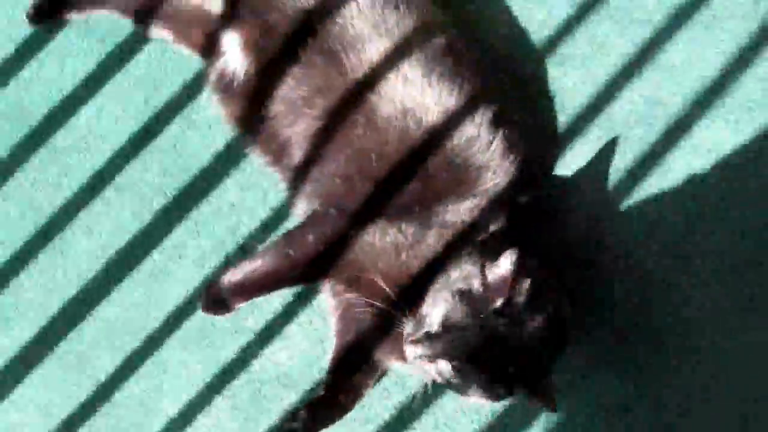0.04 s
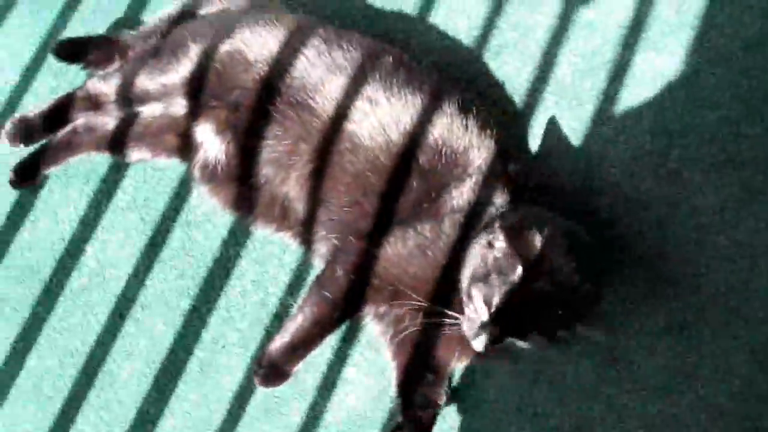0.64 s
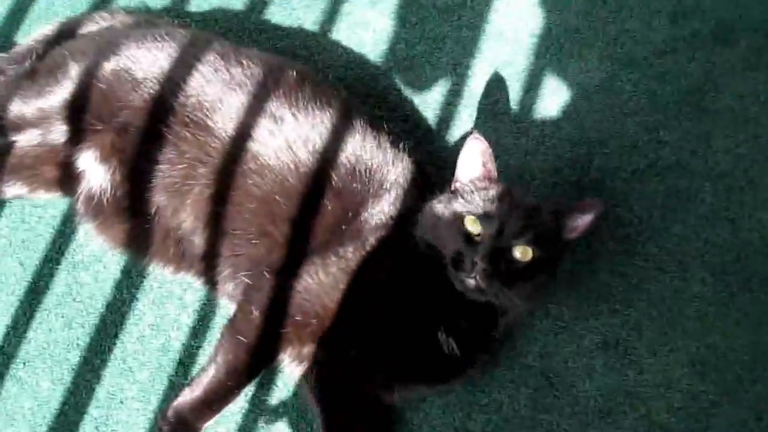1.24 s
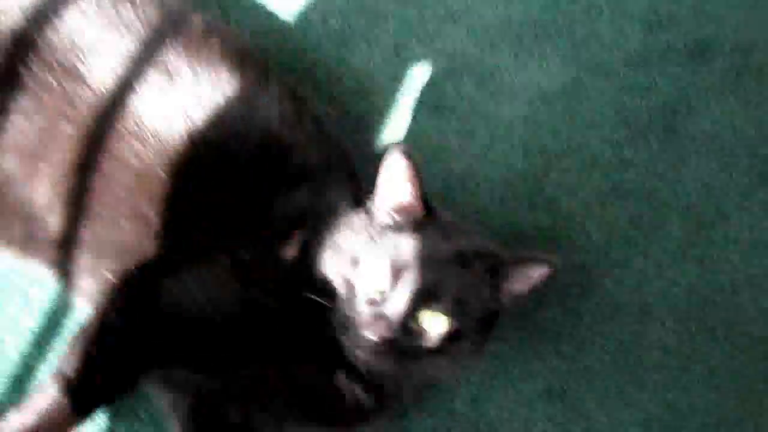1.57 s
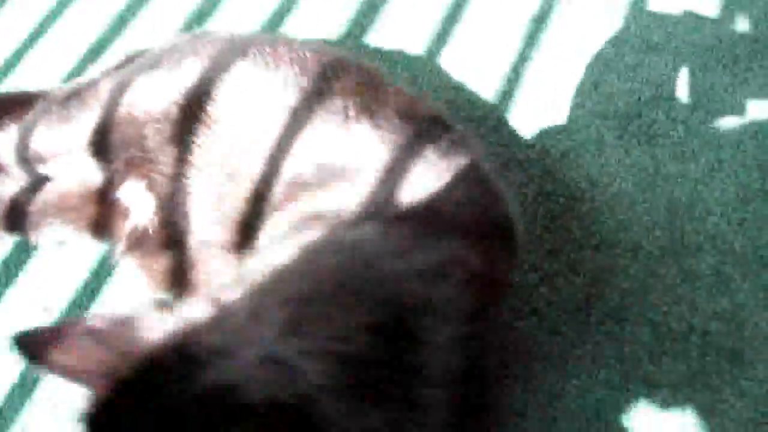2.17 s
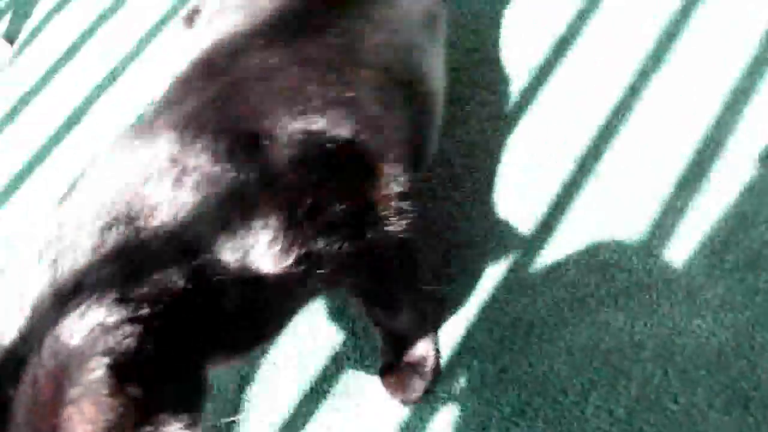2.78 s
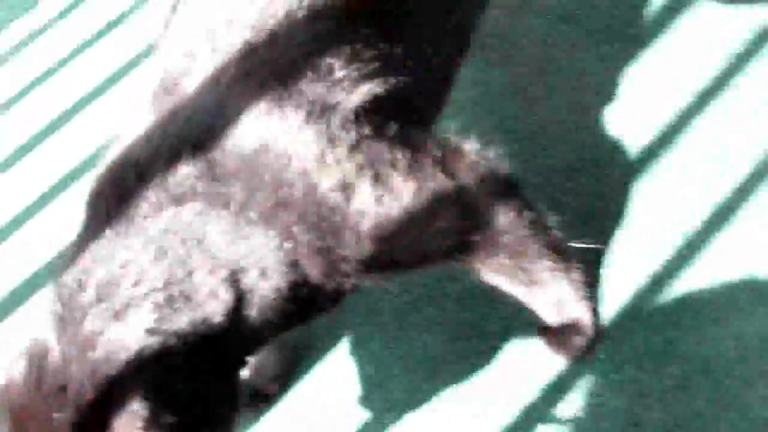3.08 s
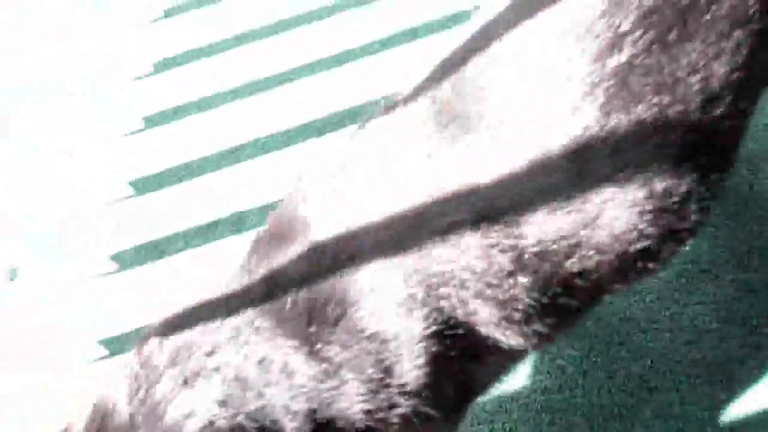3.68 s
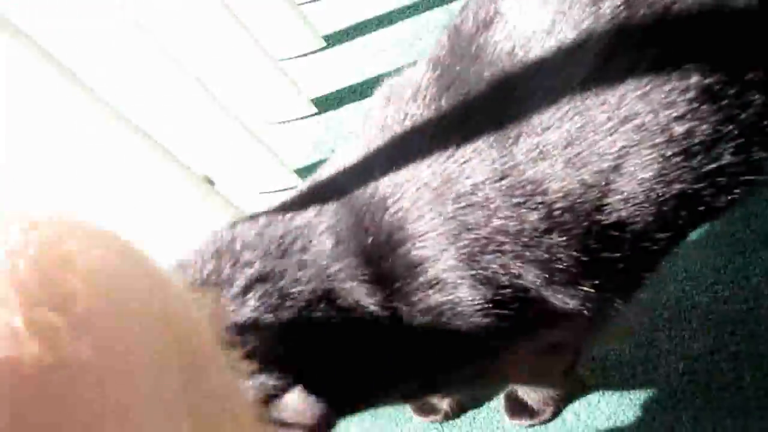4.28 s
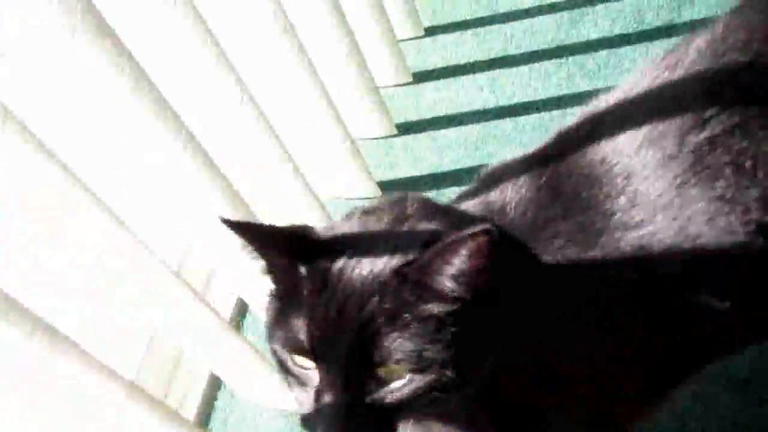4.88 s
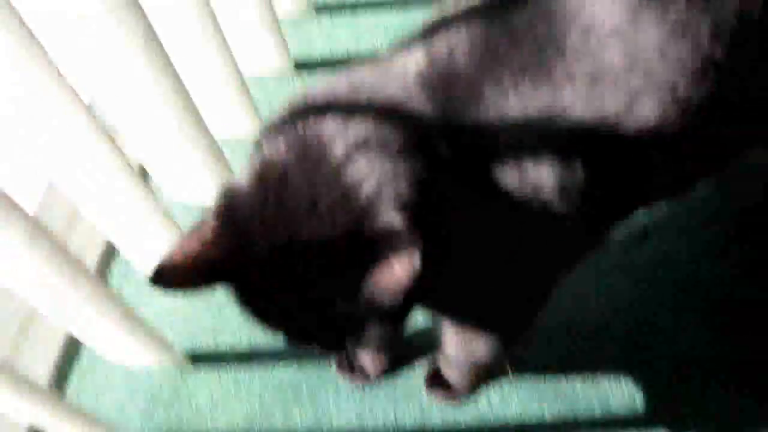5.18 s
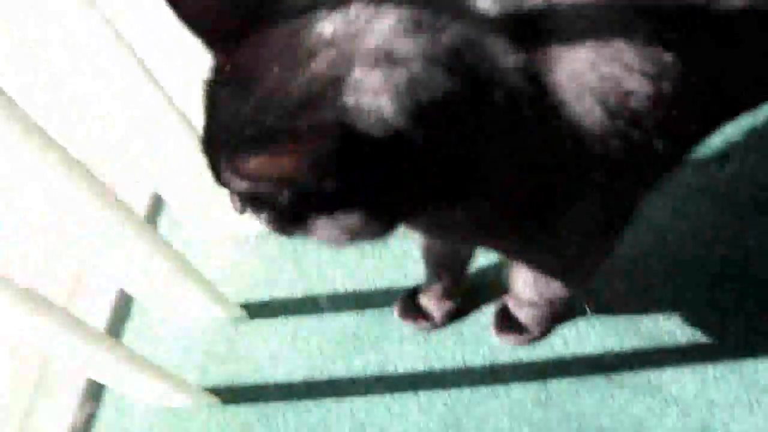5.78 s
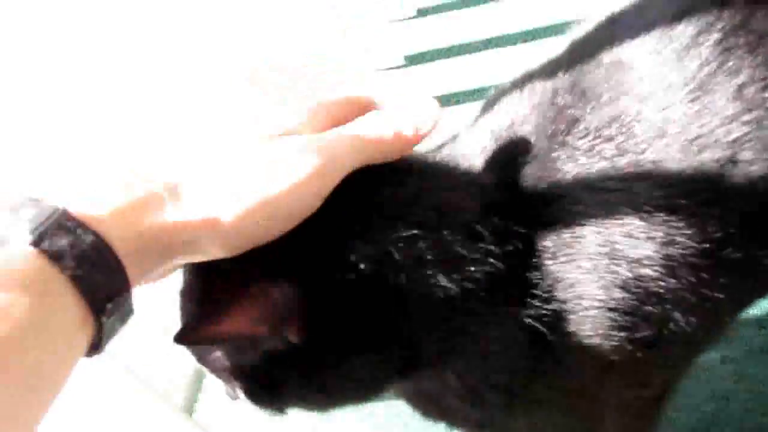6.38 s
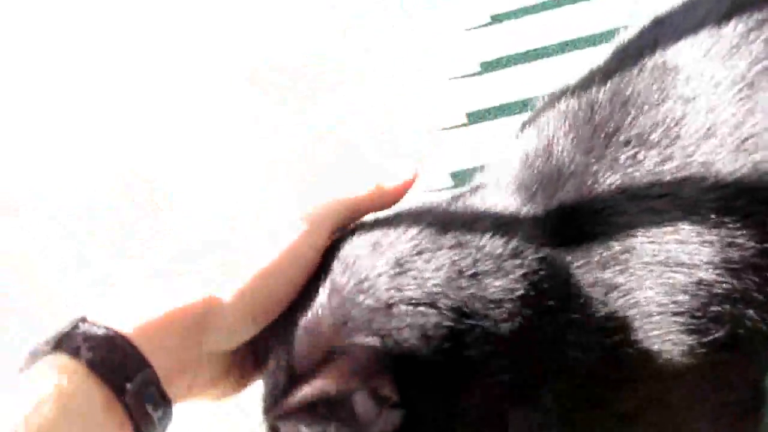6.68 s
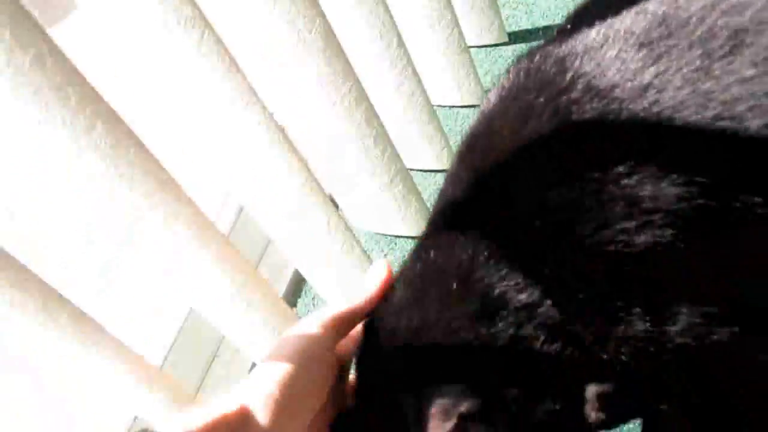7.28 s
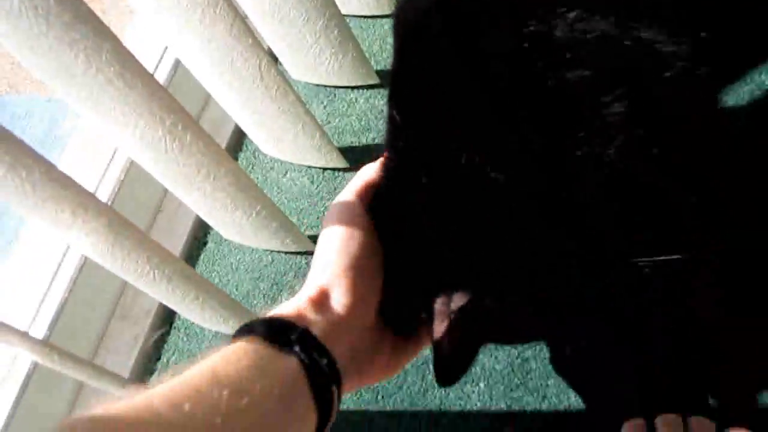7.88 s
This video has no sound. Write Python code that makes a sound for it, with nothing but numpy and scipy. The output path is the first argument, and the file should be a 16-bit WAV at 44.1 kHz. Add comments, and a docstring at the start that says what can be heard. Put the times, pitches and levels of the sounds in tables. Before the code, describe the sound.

Indoors, very close to the single microphone of a small hand-held camera, faint fur rustling and soft bumps sit over steady hiss. Then come three loud clusters of plastic clicks and creaks from a gripping hand, mixed with scratchy rubbing of skin and a cat's fur. A short dropout precedes the last cluster. The end is quieter, with scattered clicks and two more dropouts.

```python
"""First a soft brush of fur and two dull thuds over a thin hiss and whine: a cat rolls on a carpet and
is stroked, close to the one microphone of a small hand-held camera. Skin and fur brush over the camera.
Right at the microphone, the gripping hand sticks and slips, and the plastic case clicks and creaks.
The loudest clicks overload the input; three times the microphone's contact opens and the sound cuts out."""
import sys
import numpy as np
from scipy import signal
from scipy.fft import rfft, irfft
from scipy.io import wavfile
from scipy.ndimage import uniform_filter1d, minimum_filter1d

SR = 44100
rng = np.random.default_rng(int(sys.argv[2]) if len(sys.argv) > 2 else 0)


def unload_wav(signal):
    """Save mono or channel-first audio to the path in sys.argv[1] as 16-bit WAV at rate SR, clipped to [-1, 1]."""
    wavfile.write(
        sys.argv[1],
        SR,
        np.round(np.clip(np.atleast_2d(signal).T, -1, 1) * 32767).astype(np.int16),
    )


N = 350003
TIME = np.arange(N) / SR

# course of the noise floor: (time [s], level [dB])
HISS_LEVELS = [(0, -40), (.25, -46), (.9, -45.5), (1.5, -42.5), (2.1, -46.5), (2.8, -44), (3.5, -47),
               (4.7, -44), (5.9, -46.5), (6.6, -46), (7.94, -45.5)]
# colour of the camera's hiss: (frequency [Hz], relative level [dB])
HISS_SPECTRUM = [(30, -11), (70, -10), (300, -11.5), (600, -12.5), (850, -7), (1200, -7), (1430, -20.5),
                 (1750, -13.5), (2000, -10.5), (2900, -17.5), (4300, -21.5), (7000, -26), (8000, -25.5),
                 (16000, -34.5)]
# the camera's electronic whine: (frequency [Hz], level [dB], wander [Hz])
WHINE_TONES = [(7870, -63, 16), (15735, -73, 3)]

# soft bumps of paw and hand nearby: (time [s], level [dB], centre [Hz])
SOFT_BUMPS = [(.049, -47, 338), (.119, -40.5, 530), (.734, -52, 190), (1.136, -44, 275),
              (1.615, -39.5, 313), (1.675, -44, 220), (2.01, -42, 537), (4.605, -48, 200),
              (5.175, -40, 110), (5.454, -37.5, 110)]
# the hand knocks the camera and damps it: (time [s], level [dB], 60 dB decay time [s])
CAMERA_KNOCKS = [(.334, -32.5, .15), (2.852, -33.5, .075), (5.013, -22.5, .025)]
# resonances of the whole camera: (frequency [Hz], width [Hz], gain [dB])
CAMERA_MODES = [(255, 90, -6), (800, 190, 0), (1410, 300, -9)]

# skin and fur brushing past the microphone:
# (start [s], length [s], dull rub level [dB], bright hiss re rub [dB], case hollow re rub [dB])
FUR_STROKES = [(0, .3, -54.5, -11, -15), (.74, .27, -54, -15, -5), (1.238, .07, -48, 1, -12),
               (1.35, 1.2, -54, -2, -13), (2.128, .04, -31, -4, 5), (2.174, .028, -27, 2.5, 0),
               (2.203, .027, -40, -8, 4), (2.24, .045, -30, 0, -3), (2.278, .1, -30.5, -3, 1),
               (2.46, .06, -31.5, -13, -6), (3.92, .26, -45.5, -5, -12), (5.013, .033, -33, -5, 1.5),
               (5.083, .055, -36.5, -11, -3), (5.19, .24, -37, -5, -13), (5.41, .056, -35.5, -8, -7),
               (5.56, .065, -40, 1, -11), (6.814, .08, -48, -11, -12)]
# the dull rub of fur: (frequency [Hz], relative level [dB])
RUB_SPECTRUM = [(60, -33), (560, -20.5), (800, -5.5), (1300, -2.5), (2400, 1), (3700, 0), (4800, -8),
                (7000, -9), (11000, -28.5), (16000, -39.5)]
# the bright hiss of a fast stroke: (frequency [Hz], relative level [dB])
BRIGHT_SPECTRUM = [(60, -45), (500, -22.5), (2500, -7.5), (3800, 6.5), (5300, -7), (6700, -1.5),
                   (8100, 0.5), (9400, -6), (11300, -12.5), (16000, -19)]

# broad knock of the plastic case: (frequency [Hz], relative level [dB])
CASE_SPECTRUM = [(100, -52), (520, -36.5), (750, -8.5), (1050, 1.5), (1450, -6), (1900, -6), (2450, -4),
                 (2900, -5), (3700, -4), (4800, -18.5), (6500, -34.5), (10000, -44), (16000, -49.5)]
# resonances of the case: (frequency [Hz], width [Hz], gain [dB])
CASE_RESONANCES = [(759, 41, 2), (987, 79, -5), (1450, 120, 1), (2456, 260, 1)]
# squeezes of the case, each a run of stick-slip: (start [s], length [s], level [dB])
SQUEEZES = [(2.127, .085, -20), (2.238, .052, -23), (2.286, .064, -14), (2.402, .018, -29),
            (2.548, .085, -38), (3.17, .022, -31), (3.268, .044, -30), (3.391, .032, -27),
            (3.739, .021, -31), (3.804, .021, -18), (3.861, .013, -19), (3.881, .027, -15.5),
            (3.977, .049, -32), (4.042, .06, -15), (4.186, .016, -24), (4.549, .06, -25),
            (5.087, .026, -29), (5.113, .034, -21), (5.34, .034, -29), (5.45, .014, -17),
            (5.553, .07, -15.5), (5.696, .05, -36), (6.382, .026, -32)]
# bright crack of a hard snap: (frequency [Hz], relative level [dB])
CRACK_SPECTRUM = [(50, -42), (500, -23.5), (1500, -10.5), (3000, 1), (5200, 0), (6100, -2), (7300, -4),
                  (9500, -7), (12500, -13), (16000, -15.5)]
# small parts ringing around the microphone: (frequency [Hz], width [Hz], gain [dB])
CRACK_RESONANCES = [(2030, 200, 1), (3340, 900, -6.5), (5190, 260, -3), (7150, 340, 0)]
# the loudest slips of the case: (time [s], ring level [dB], ring centre [Hz], crack level [dB])
CASE_SLIPS = [(1.2388, -25, 3180, -25), (1.7633, -28, 3000, -44), (2.1286, 0, 1850, -7.5),
              (2.159, -18, 1720, -24.5), (2.2915, -8, 1680, -20), (2.336, -8.5, 1700, -44),
              (2.4021, -16.5, 2150, -29), (2.4365, -16.5, 1430, -68), (2.4457, -8, 1650, -13),
              (2.5521, -19, 1550, -56), (2.6607, -20, 1760, -52), (2.8494, -0.5, 1930, -2.5),
              (3.1796, -22.5, 1650, -49), (3.2855, -19, 1430, -59), (3.749, -19.5, 1450, -50),
              (3.8025, -19, 1810, -55), (3.831, -9.5, 1700, -28), (3.8807, -8, 1630, -30.5),
              (4.0212, -23, 1450, -13.5), (4.06, -18.5, 1800, -22), (4.1609, -13.5, 1780, -34),
              (4.1848, -21, 1620, -52), (4.2012, -19, 1700, -52), (4.3237, -25.5, 1310, -55),
              (5.015, -15, 950, -23.5), (5.022, -12, 1700, -8.5), (5.1176, -15, 1730, -50),
              (5.145, -11, 1870, -37), (5.1494, -16, 2370, -48), (5.1753, -5, 1880, -24),
              (5.1796, -4, 1720, -29.5), (5.2455, -21.5, 920, -42), (5.2944, -18.5, 1570, -32),
              (5.3999, -25, 2580, -22.5), (5.4536, -11.5, 1500, -8), (5.4598, -29, 1980, -14.5),
              (5.5413, -13, 1860, -46), (5.5682, -8, 1700, -35), (5.5782, -5, 1760, -26.5),
              (5.5924, -21, 1640, -24.5), (5.6245, -19.5, 1390, -27.5), (5.6618, -19.5, 1740, -44),
              (5.7497, -24.5, 1770, -54), (6.083, -16.5, 1750, -47), (6.382, -16, 1800, -55),
              (6.6169, -37.5, 1450, -34), (6.846, -30, 1600, -52), (7.6816, -15, 1720, -53),
              (7.892, -16, 1790, -64)]

# the microphone's contact is open: (start [s], end [s])
OPEN_CONTACT = [(4.852, 4.9945), (6.186, 6.327), (7.087, 7.2285)]
# it bounces once as it opens: (delay [s], length [s], gain [dB])
CONTACT_BOUNCE = (.0115, .007, 9)


def undb(db):
    """Decibels to gain."""
    return 10 ** (np.asarray(db) / 20)


def level(x, db, size=None):
    """Scale x so that its energy, spread over size samples, has this rms level."""
    return x * undb(db) / np.sqrt(np.sum(x ** 2) / (size or len(x)) + 1e-20)


def add(out, start_s, x):
    """Mix x into out from start_s on."""
    i = max(int(start_s * SR), 0)
    out[i:i + len(x)] += x[:max(N - i, 0)]


def drift(rate_hz):
    """Smooth random drift with a spread near 1."""
    knots = rng.standard_normal(int(rate_hz * N / SR) + 2)
    return np.interp(TIME * rate_hz, np.arange(len(knots)), knots)


def response(spectrum):
    """Minimum-phase impulse response with the given spectrum."""
    hz, db = np.transpose(spectrum)
    grid_hz = np.maximum(np.fft.rfftfreq(1024, 1 / SR), 1)
    gain = undb(np.interp(np.log(grid_hz), np.log(hz), db))
    cepstrum = irfft(np.log(gain))
    half = len(cepstrum) // 2
    folded = np.r_[cepstrum[0], 2 * cepstrum[1:half], np.zeros(half)]
    return irfft(np.exp(rfft(folded)))[:half]


def resonate(x, hz, width_hz):
    """Two-pole resonance, gain 1 at its centre."""
    return signal.lfilter(*signal.iirpeak(hz, hz / width_hz, fs=SR), x)


def band(x, hz, width_hz):
    """A resonance applied twice, for steep sides."""
    return resonate(resonate(x, hz, width_hz), hz, width_hz)


def noise_floor(hollow_hz=1150, flicker_db=1.84):
    """The camera's own flickering hiss, with a hollow resonance and a thin electronic whine."""
    hiss = signal.fftconvolve(rng.standard_normal(N), response(HISS_SPECTRUM))[:N]
    hollow = resonate(rng.standard_normal(N), hollow_hz, width_hz=200)
    hollow = resonate(hollow, hollow_hz, width_hz=390)
    floor_db = np.interp(TIME, *np.transpose(HISS_LEVELS)) + flicker_db * drift(rate_hz=14)
    out = (level(hiss, -1) + level(hollow, -6)) * undb(floor_db)
    for hz, db, wander_hz in WHINE_TONES:
        pitch_hz = hz + wander_hz * drift(rate_hz=55)
        out += level(np.sin(2 * np.pi * np.cumsum(pitch_hz) / SR), db)
    return out


def thump(db, hz, width_hz, t60_s, rise_s=.003):
    """A soft push that dies away in one resonance."""
    t = np.arange(SR // 3) / SR
    envelope = (1 - np.exp(-t / rise_s)) * np.exp(-np.log(1000) * t / t60_s)
    push = rng.standard_normal(len(t)) * envelope
    return level(band(push, hz, width_hz), db, size=SR // 40)


def bumps():
    """Paw and hand land nearby with short, dull thuds; a knock on the camera rings its low modes."""
    out = np.zeros(N)
    for start, db, hz in SOFT_BUMPS:
        add(out, start, thump(db, hz, width_hz=1.05 * hz, t60_s=.09))
    for start, db, t60_s in CAMERA_KNOCKS:
        for hz, width_hz, mode_db in CAMERA_MODES:
            add(out, start, thump(db + mode_db, hz, width_hz, t60_s))
    add(out, 3.734, thump(db=-35, hz=38, width_hz=26, t60_s=.59))  # rumble as the camera swings round
    return out


def swell(length_s, attack_share, shape):
    """Pressure of a touch: it builds to a peak and lets go."""
    progress = np.linspace(0, 1, int(length_s * SR))
    return np.interp(progress, [0, attack_share, 1], [0, 1, 0]) ** shape


def fur_strokes(grain_db=2.5, firm_db=-30, firm_catch_db=4, sudden_s=.09):
    """Hairs flick past the microphone; firm contact catches in jerks and sounds the case's hollow."""
    flicks = rng.standard_normal(N) * undb(grain_db * rng.exponential(size=N).clip(0, 5))
    rub = signal.fftconvolve(flicks, response(RUB_SPECTRUM))[:N]
    bright = signal.fftconvolve(flicks, response(BRIGHT_SPECTRUM))[:N]
    bright += undb(1) * band(bright, hz=9300, width_hz=900)
    hollow = band(flicks, hz=800, width_hz=110) + undb(-6) * band(flicks, hz=1300, width_hz=420)
    out, jerks = np.zeros(N), drift(rate_hz=330)
    for start, length, db, bright_db, hollow_db in FUR_STROKES:
        attack_share = .6 * length / (length + sudden_s)  # short strokes start abruptly
        pressure = swell(length, attack_share, shape=.9)
        first = int(start * SR)
        span = slice(first, first + len(pressure))
        catch_db = firm_catch_db * undb((db - firm_db) / 2)  # light strokes glide more evenly
        pressure *= undb(catch_db * jerks[span])
        for sound, relative_db in (rub, 0), (bright, bright_db), (hollow, hollow_db):
            add(out, start, level(sound[span] * pressure, db + relative_db))
    return out


def plastic_response(spectrum, modes):
    """Impulse response of a plastic part: a broad knock and a few modes that ring on."""
    knock = np.pad(response(spectrum), (0, SR // 60))
    return knock + sum(undb(db) * resonate(knock, hz, width_hz) for hz, width_hz, db in modes)


def case_ring(force, case, hz, width_hz, broad_db):
    """The case answers a force; the place of contact favours one part of its range."""
    sound = signal.fftconvolve(force, case)
    return band(sound, hz, width_hz) + undb(broad_db) * sound


def case_creaks(case, slip_hz=500, unevenness=.5, scatter_db=3.3, scrape_db=-26, octaves_per_db=.008):
    """A finger beside the microphone sticks and slips a few hundred times a second, never evenly."""
    out = np.zeros(N)
    for start, length, db in SQUEEZES:
        pressure = swell(length, attack_share=.3, shape=.6)
        timing, strength = rng.standard_normal((128, 2)).T
        slip_at = np.cumsum(SR / slip_hz * np.exp(unevenness * timing)).astype(int)
        slip_at -= slip_at[0] // 2
        force = undb(scrape_db) * rng.standard_normal(SR // 4)[:len(pressure)]
        inside = slip_at < len(force)
        force[slip_at[inside]] += undb(scatter_db * strength[inside])
        ring_hz = 1700 * 2 ** (octaves_per_db * db)  # a harder squeeze rings the case higher
        creak = case_ring(force * pressure, case, ring_hz, width_hz=1300, broad_db=-9)
        add(out, start, level(creak, db, size=len(force)))
    return out


def grip_ticks(count=6, start_s=.75, end_s=2.1, ring_hz=2000, db_range=(-47, -41)):
    """Faint slips at random moments as the grip shifts, in rows like those of CASE_SLIPS."""
    low_db, high_db = db_range
    ticks = rng.uniform((start_s, low_db), (end_s, high_db), size=(count, 2))
    return [(time, db, ring_hz, db) for time, db in ticks]


def case_clicks(case, rattle_s=.0025, rattle_db=-25, after_slip_s=.0035, after_slip_db=-15):
    """Right at the microphone, each sudden slip rings the case, with a bright crack and a low push."""
    out = np.zeros(N)
    small_parts = plastic_response(CRACK_SPECTRUM, CRACK_RESONANCES)
    t = np.arange(SR // 40) / SR
    blow = signal.unit_impulse(len(t))
    thud = band(blow, hz=370, width_hz=1100)
    for start, ring_db, ring_hz, crack_db in CASE_SLIPS + grip_ticks():
        grit, chatter = rng.standard_normal((2, len(t)))
        # a slip seldom ends at once: a weaker one follows
        lag = int(SR * after_slip_s * np.exp(.3 * rng.standard_normal()))
        after_slip = undb(after_slip_db) * np.roll(blow, lag)
        rattle = undb(rattle_db) * chatter * np.exp(-t / rattle_s)
        ring = case_ring(blow + after_slip + rattle, case, ring_hz, width_hz=850, broad_db=-12)
        grind_s = .00092 + .0024 * undb(crack_db / 2)  # a harder snap grinds for longer
        crack = signal.fftconvolve(grit * np.exp(-(t / grind_s) ** 2), small_parts)
        thud_db = -12 + .55 * crack_db + .4 * ring_db
        for sound, db in (ring, ring_db), (crack, crack_db), (thud, thud_db):
            add(out, start, level(sound, db, size=SR // 230))
    return out


def scene():
    """Close handling noise and the cat over the camera's noise floor, in mono."""
    case = plastic_response(CASE_SPECTRUM, CASE_RESONANCES)
    return (case_clicks(case) + case_creaks(case) + fur_strokes() + bumps() + noise_floor())[None]


def loose_contact(x, leak_db=-30, bias=.026, settle_s=.038):
    """The microphone's contact opens, bounces and closes; opening and closing each step the bias."""
    gate, steps = np.ones(N), np.zeros(N)
    bias_step = bias * np.exp(-TIME[:SR // 3] / settle_s)
    delay, length, bounce_db = CONTACT_BOUNCE
    for start, end in OPEN_CONTACT:
        is_open = (TIME >= start) & (TIME < end)
        since_bounce = TIME[is_open] - start - delay
        bounce = (since_bounce > 0) * np.exp(-(since_bounce / length) ** 2)
        gate[is_open] = undb(leak_db) + undb(bounce_db) * bounce
        add(steps, start, -bias_step)
        add(steps, end, bias_step)
    return x * gate + steps


def gain_control(x, threshold=.35, release_s=.056, depth=19.1):
    """Peaks above the threshold turn the camera's gain down for a moment."""
    excess = np.maximum(abs(x) - threshold, 0)
    decay = np.exp(-1 / (release_s * SR))
    held_excess = signal.lfilter([1 - decay], [1, -decay], excess)
    return x / (1 + depth * held_excess)


def overload(x, ceiling=1.6):
    """A fast limiter holds down the peaks; whatever is still above full scale clips."""
    window = SR // 1500
    gain = minimum_filter1d(ceiling / np.maximum(abs(x), ceiling), window)
    return np.clip(x * uniform_filter1d(gain, window), -1, 1)


def record(dry, top_hz=16200):
    """From the microphone through the camera: dropouts, gain control, overload and a steep top cut."""
    x = overload(gain_control(loose_contact(dry[0])))
    lowpass = signal.ellip(10, .2, 95, top_hz, fs=SR, output="sos")
    return signal.sosfilt(lowpass, x)[None]


dry = scene()
out = record(dry)
unload_wav(out)
```